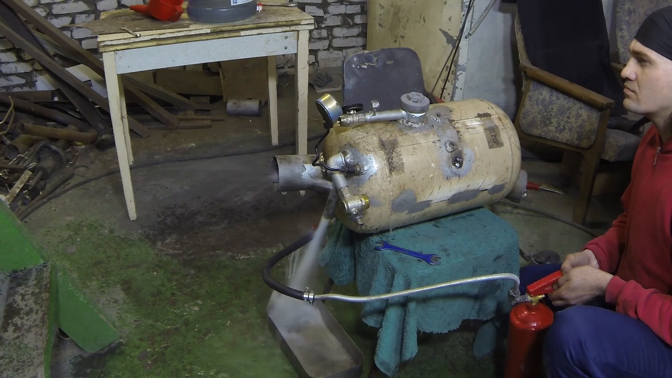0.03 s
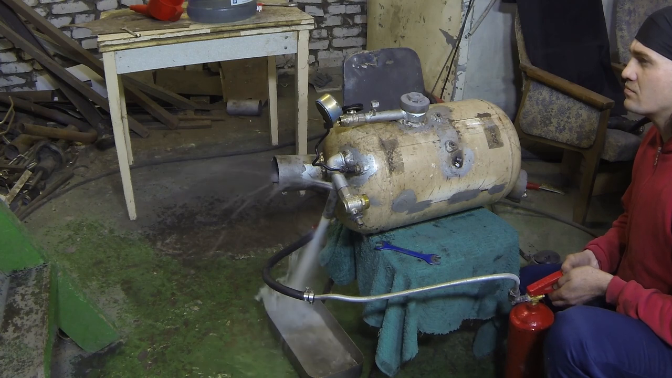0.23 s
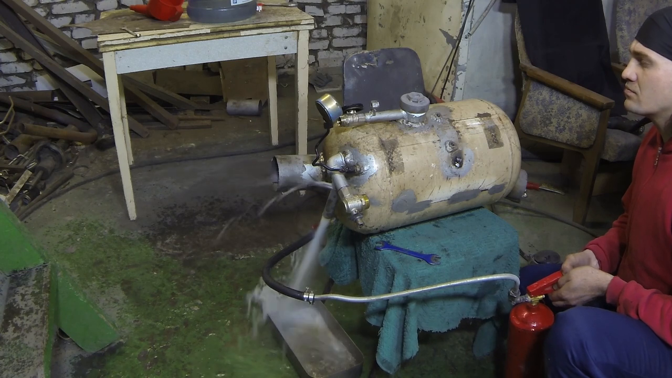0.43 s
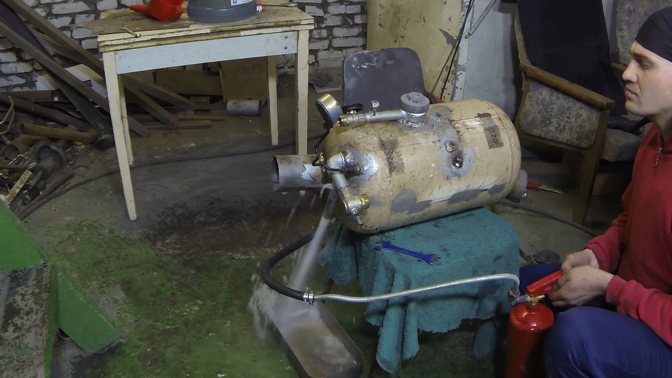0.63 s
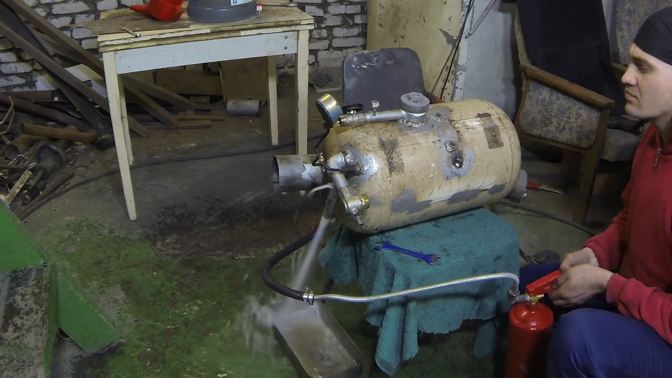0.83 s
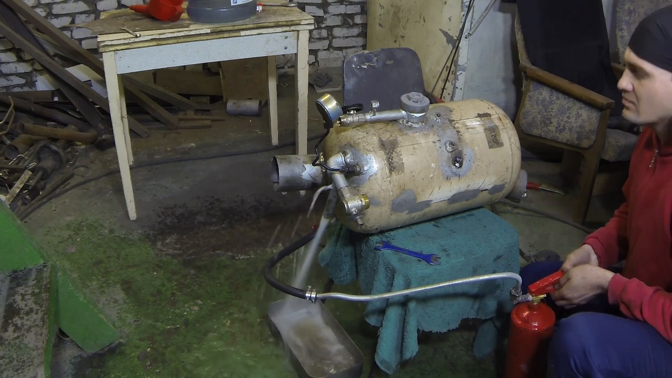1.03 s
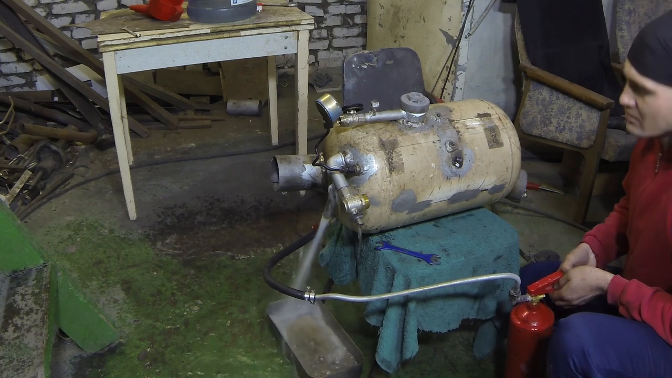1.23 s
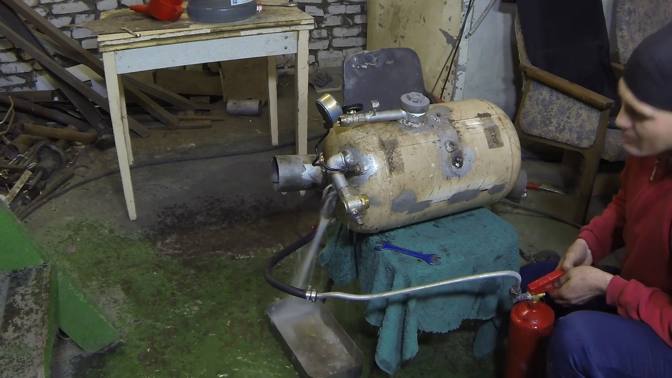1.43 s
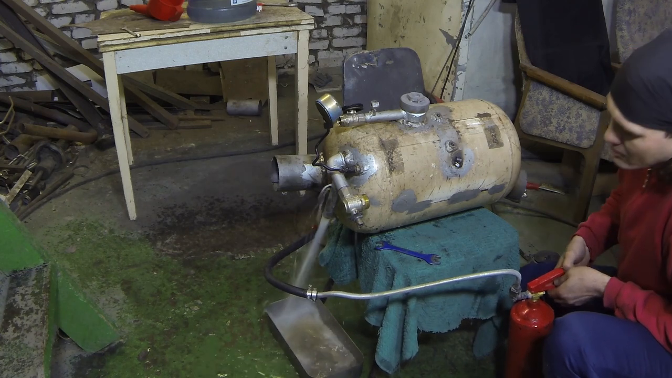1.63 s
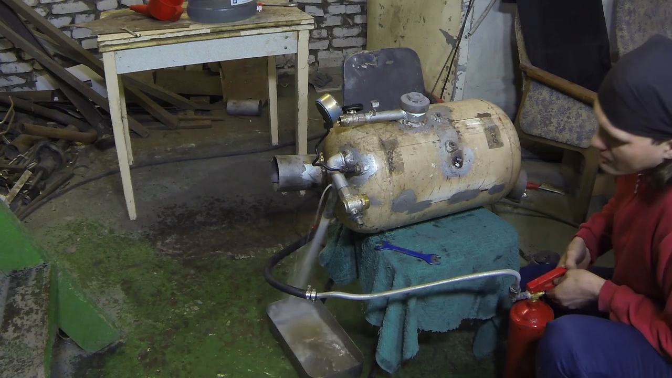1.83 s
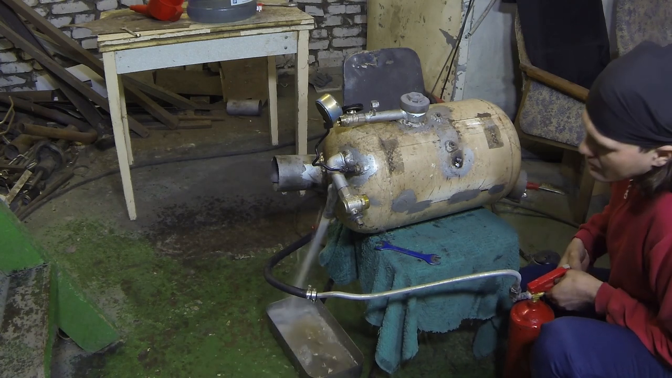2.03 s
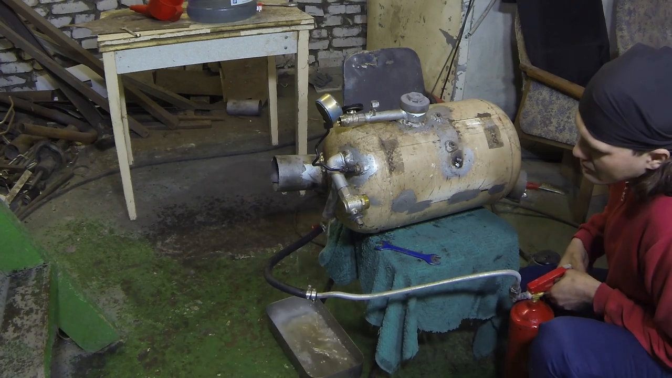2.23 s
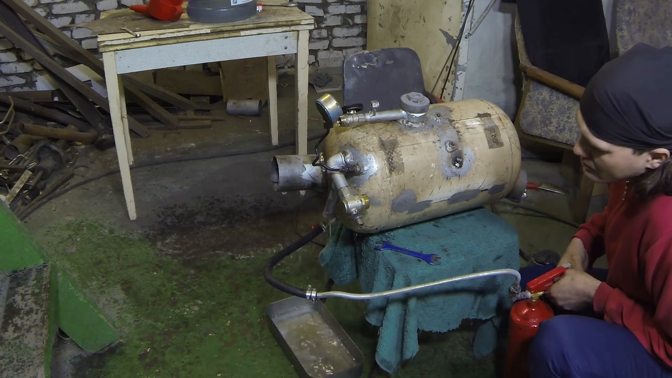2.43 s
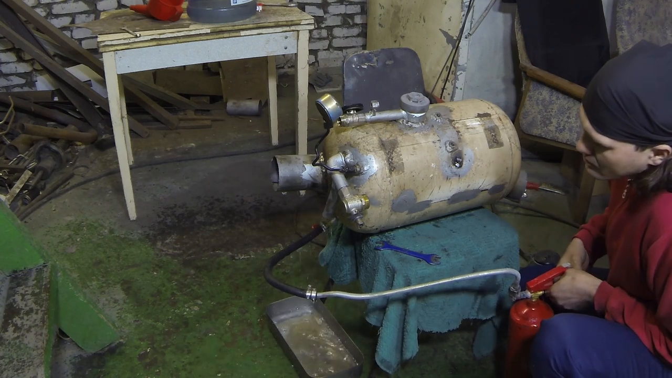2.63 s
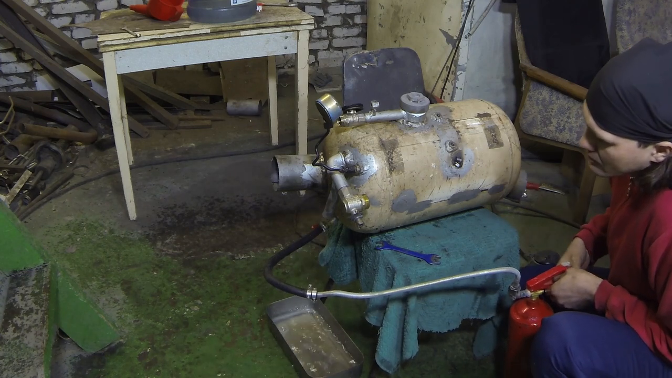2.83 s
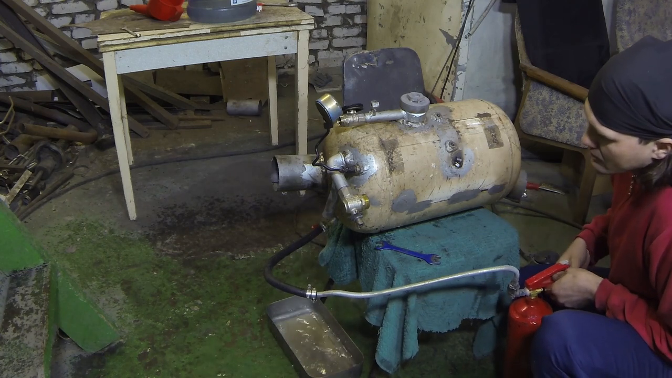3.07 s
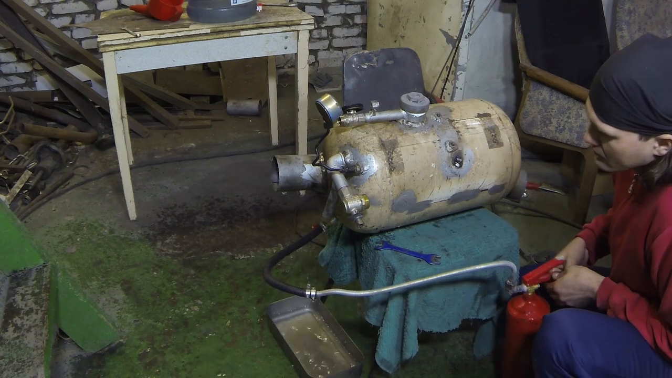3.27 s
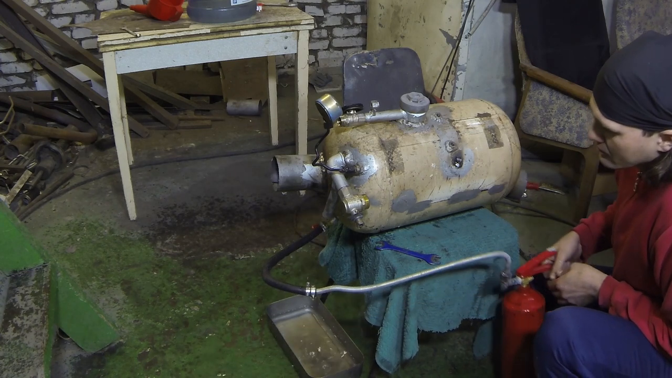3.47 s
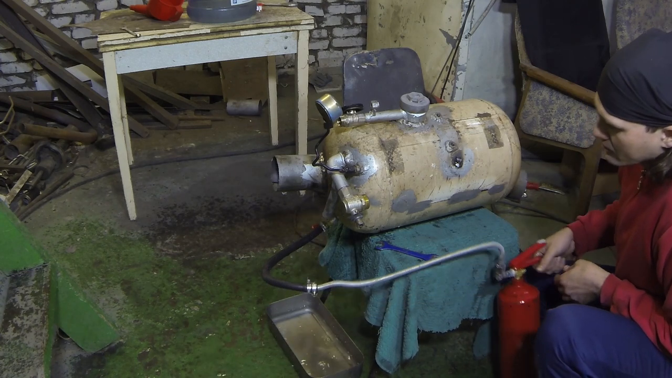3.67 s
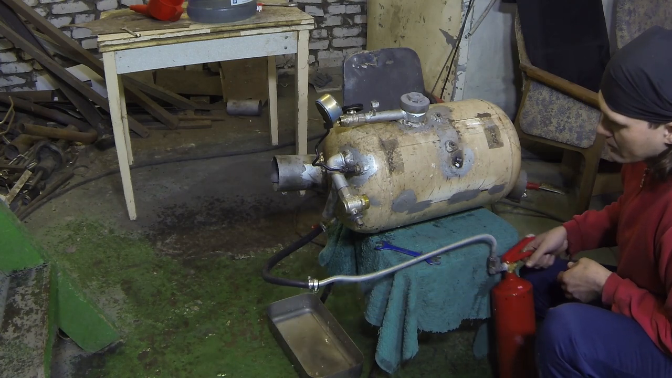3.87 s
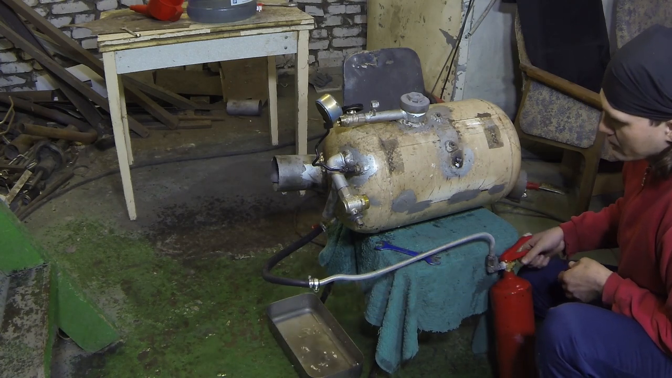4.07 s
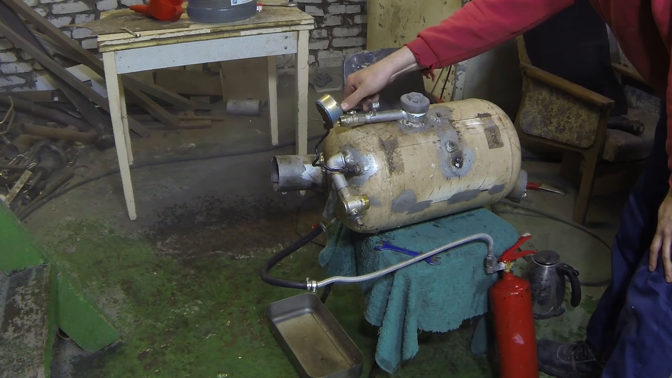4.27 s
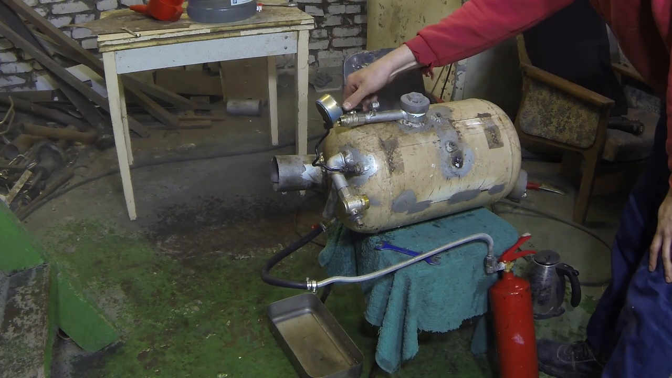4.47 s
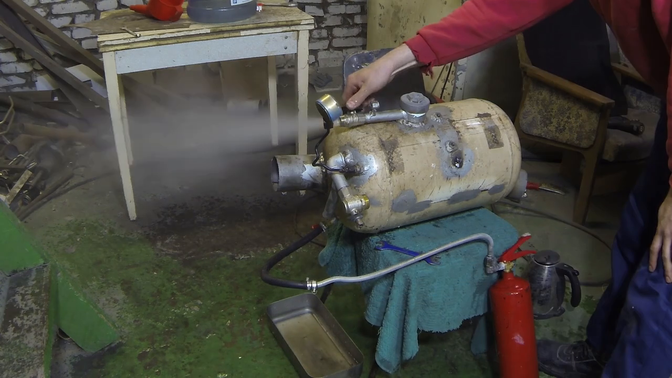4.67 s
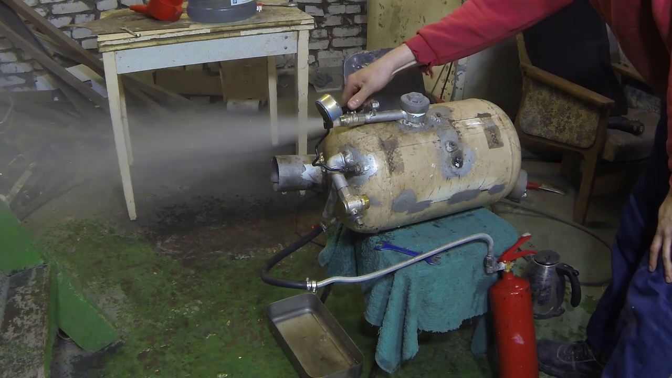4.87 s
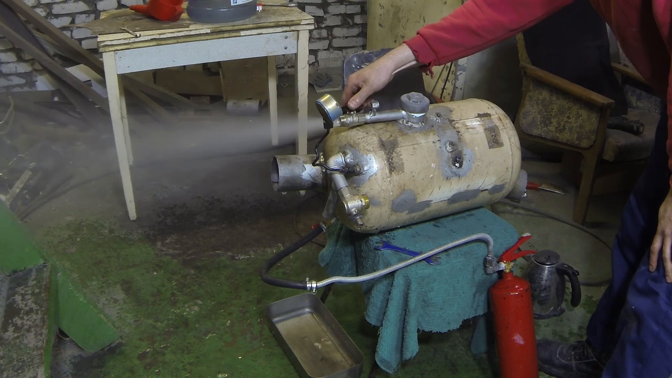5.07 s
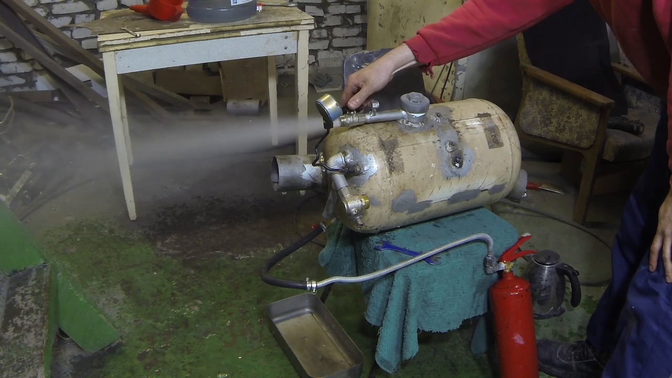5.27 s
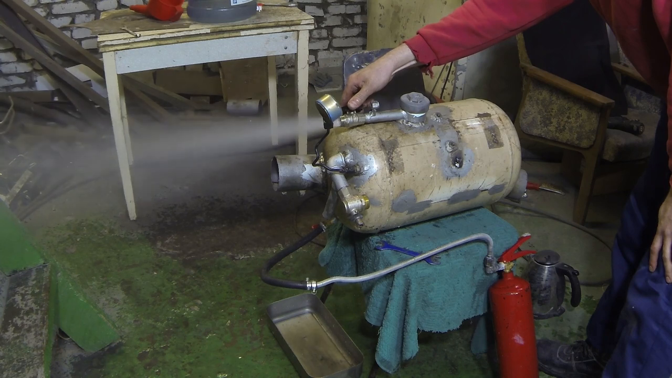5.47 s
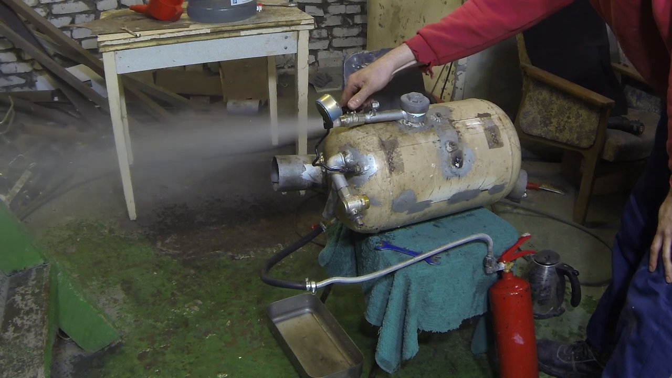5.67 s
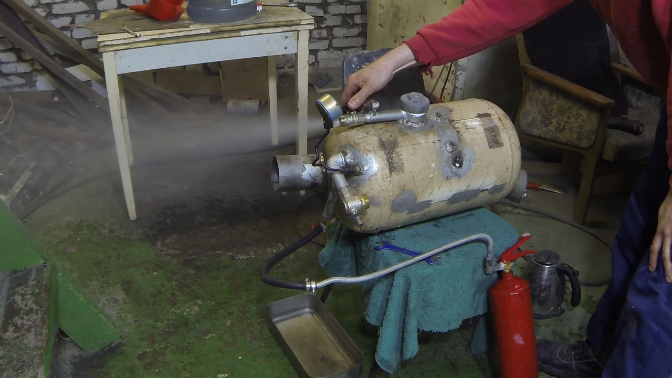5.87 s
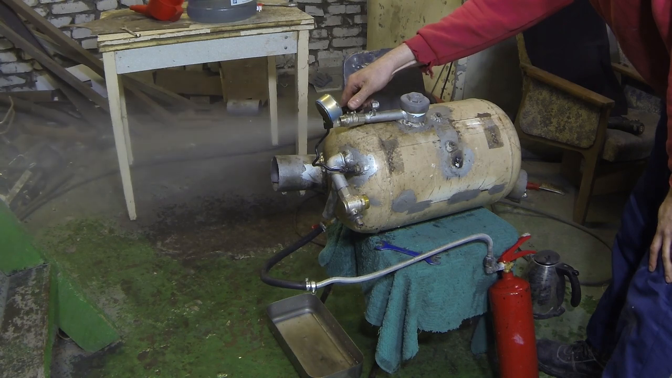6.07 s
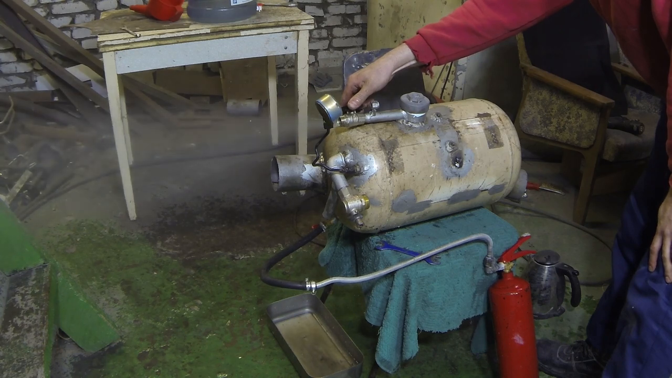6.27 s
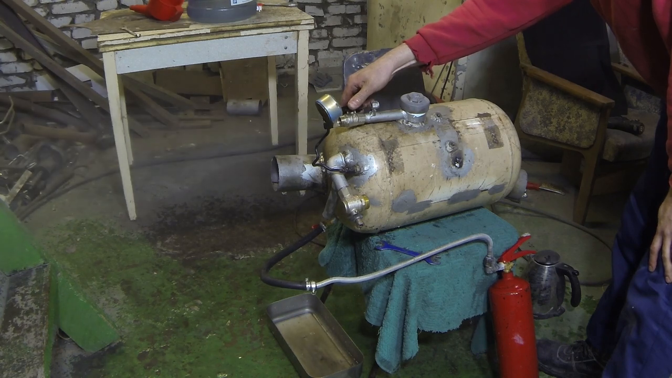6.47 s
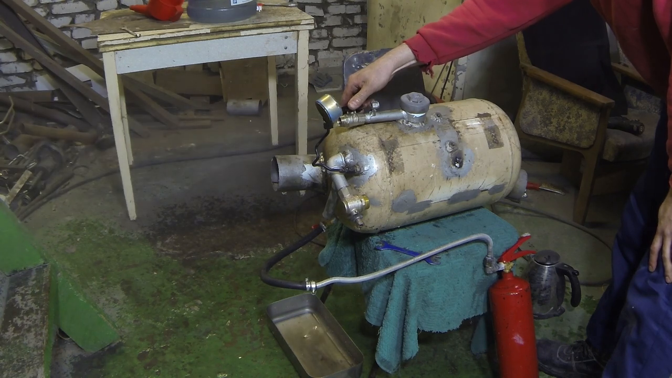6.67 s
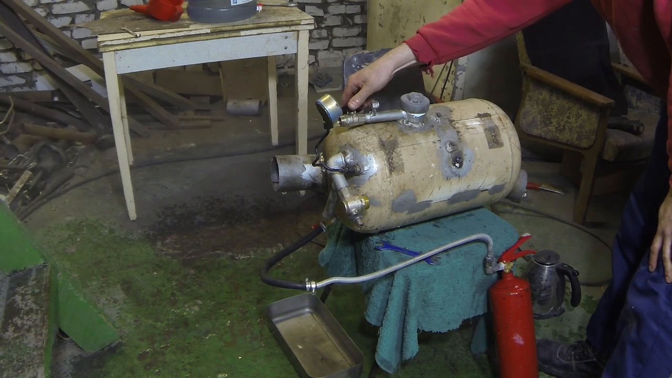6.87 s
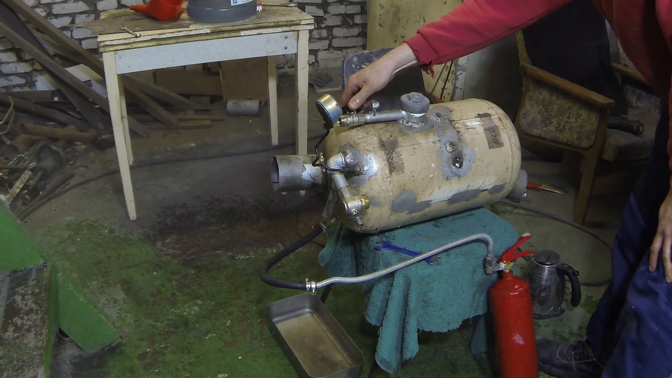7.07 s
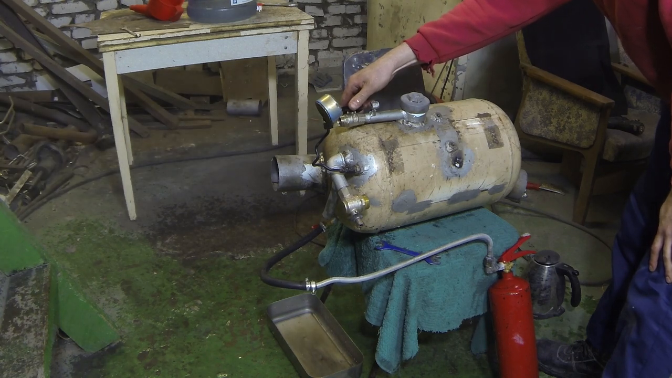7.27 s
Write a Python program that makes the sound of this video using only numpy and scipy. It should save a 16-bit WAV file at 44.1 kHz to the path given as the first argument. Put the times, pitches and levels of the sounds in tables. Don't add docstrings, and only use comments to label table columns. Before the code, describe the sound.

Water sprays hissing onto a metal tray, fades and shuts off; drips and small metal clinks, then a sudden loud shrill gas blast in a brick workshop.

```python
import sys
import numpy as np
from scipy import signal
from scipy.fft import rfft, irfft, next_fast_len
from scipy.io import wavfile
from scipy.ndimage import uniform_filter1d

SR = 44100
rng = np.random.default_rng(int(sys.argv[2]) if len(sys.argv) > 2 else 0)


def volts_from_db(level):
    exponent = np.asarray(level, float) / 20
    return 10 ** exponent


def inscribe(sig):
    pcm = np.round(np.clip(np.atleast_2d(sig).T, -1, 1) * 32767)
    wavfile.write(sys.argv[1], SR, pcm.astype(np.int16))


N = 322371
SHUT_S = 1.988

# start_s, level_db, dryness [0-1: dry gas is shrill, wet gas rings the throat]
BLAST = [(4.55, -11, -0.011), (4.68, -13, 0.74), (5.025, -13, 1.0), (5.06, -13.5, .12), (5.6, -13, -0.05),
         (5.88, -12, 0.39), (6.05, -14, 0.18), (6.6, -15, 0.074), (7.31, -17, -0.17)]
# pitch_hz, density_db [dB per Hz]
BLAST_COLOUR = [(150, -69), (250, -23.5), (583, -19), (852, -21), (1360, -13.5), (2360, -9), (3060, -2.5),
                (3570, 0), (4630, -7.5), (6540, -9.5), (7250, -15), (10800, -12.5), (12200, -18),
                (14500, -21.5), (15500, -29)]
# pitch_hz, width_hz, level_db
NOZZLE = [(2330, 20, -11), (2480, 18, -26), (2725, 25, -3), (2975, 19, -0.5), (3004, 36, -1.5),
          (3130, 11, 3), (3310, 29, -5), (3560, 38, -0.5), (3540, 41, -10.5), (3650, 16, -4.5),
          (3810, 26, -16), (4055, 40, -20), (4360, 25, -19.5), (5900, 60, -7), (6260, 40, -16),
          (7840, 110, -9.5), (8600, 200, -8), (9300, 150, -12)]
# start_s, pitch_hz, level_db [against the top of the blast]
EDGE_TONE = [(4.48, 11580, 9), (4.5, 10730, 18), (4.525, 10590, -3), (4.6, 10520, -6.5), (5.0, 10410, -6.5),
             (5.7, 10670, -7.5), (6.2, 11200, -13.5), (7.3, 11360, -3)]
# centre_s, length_s, roar_db, added_dryness [0-1]
SLUGS = [(4.802, 0.02, 5.5, -0.13), (5.064, 0.019, 4, .05), (5.312, 0.096, 10.5, 0.05),
         (5.503, 0.062, 8.5, 0.038), (5.172, 0.035, 0.5, -0.06), (5.664, 0.021, -4, 0.25),
         (5.794, 0.048, -0.5, -0.18), (6.297, .05, 0.5, -0.11), (6.622, 0.032, 4.5, .1),
         (6.746, 0.025, 0, -0.15), (7.075, 0.053, -0.5, .1)]


def gas_blast():
    level_db, dry = in_time(BLAST)
    dry = dry + sum(drier * swell(s, length) for s, length, db, drier in SLUGS)
    slug_db = sum(db * swell(s, length) for s, length, db, drier in SLUGS)
    above_db = level_db - level_db[-SR:].mean()

    throat_db = level_db - 2.5 - 11 * dry
    roar_db = 6 * dry - 0.91 * above_db + slug_db
    hiss_db = 13.5 * dry + 0.73 * above_db
    top_db = 17.5 * dry + 1.12 * above_db

    crack_s, open_s, pop_s = 4.489, 4.522, 0.004
    opening_s = [crack_s - 0.009, crack_s, open_s, open_s + pop_s]
    opening_db = np.interp(np.arange(N) / SR, opening_s, [-80, -36, -10, 0])

    shifts = [(1200, roar_db), (2100, roar_db * 0.33 + slug_db * 0.48), (3300, 0), (4800, hiss_db * 0.73),
              (6500, hiss_db), (10500, top_db), (14500, top_db * 0.76)]
    jet = volts_from_db(1.0) * turbulence(BLAST_COLOUR, gust_db=0.5, patchy_db=1.4, shifts=shifts)
    pipe = volts_from_db(-13) * whistles(NOZZLE, flutter_db=1.2)
    pipe += fade(4.57, 4.68) * whistles([(3300, 580, -2)], flutter_db=-0.5)
    pipe += (1 - fade(5.5, 6.1)) * whistles([(3485, 540, -8)], flutter_db=2.0)

    tone_hz, tone_db = in_time(EDGE_TONE)
    low_pass = signal.butter(2, 360.0, fs=SR, output="sos")
    wobble = rms_one(signal.sosfilt(low_pass, rng.standard_normal(N)))
    tone = wobble * np.sin(2 * np.pi * np.cumsum(tone_hz) / SR)
    tone *= volts_from_db(top_db + tone_db - 5 + 1.1 * drift(6))
    return volts_from_db(throat_db + opening_db) * (jet * spatter(per_s=220.0, spread_db=2.5) + pipe + tone)


# pitch_hz, density_db [dB per Hz]
WATER_COLOUR = [(18, -55), (30, -27), (225, -17.5), (307, -13.5), (332, -14.5), (432, -3), (518, -7.5),
                (747, -2), (830, -4.5), (1640, -10), (5040, -7), (6370, -6.5), (8280, -13), (9430, -10),
                (15500, -20)]
# pitch_hz, width_hz, level_db
TRAY = [(442.7, 38, 1), (489.3, 17, -1.5), (560.6, 16, -1), (632, 8.2, -4), (670, 9.2, 4), (743, 17, 2),
        (796.6, 18, -11), (896, 15, -4)]
# pitch_hz, width_hz, level_db [against the hiss]
SEAT_WHISTLES = [(4040, 300, -11), (5020, 820, -7.5), (5680, 200, -13), (6250, 230, -12.5),
                 (14900, 80, -34)]


def water_jet():
    t = np.arange(N) / SR
    sag_db = -3.5 * np.minimum(t, SHUT_S)
    collapse_db = 84 * np.maximum(t - SHUT_S, 0)
    hiss_db = -17.5 + sag_db - collapse_db
    drum_db = 1.0 + 0.61 * sag_db + 8.5 * swell(2.03, 0.037)
    drum_db += 0.21 * collapse_db
    top_db = 0.4 + 0.05 * sag_db
    shifts = [(700, drum_db), (4000, 0), (11000, top_db)]
    spray = volts_from_db(2.0) * turbulence(WATER_COLOUR, gust_db=0.0, patchy_db=0.1, shifts=shifts)
    tray = volts_from_db(drum_db - 16) * whistles(TRAY, flutter_db=1.5)
    seat = whistles(SEAT_WHISTLES, flutter_db=1.5)
    seat += fade(0.073, 0.75) * whistles([(3064, 200, -6)], flutter_db=2.0)
    seat += fade(1.0, 1.7) * whistles([(9340, 210, -11)], flutter_db=1.9)
    jet = spray * spatter(per_s=150.0, spread_db=2.0) + tray + seat
    return volts_from_db(hiss_db) * jet * fade(2.2, 2.48)


# start_s, length_s, pitch_hz, level_db
BOOMS = [(2.475, .075, 824, -48.5), (2.475, 0.062, 756, -54), (2.48, 0.16, 517, -57),
         (2.61, 0.068, 840, -40.5), (2.615, 0.071, 743, -51.5), (2.706, 0.072, 846, -53),
         (2.761, .11, 470, -51), (2.765, 0.096, 550, -49.5), (2.77, 0.091, 642, -50), (2.77, .13, 313, -56),
         (3.58, .08, 1220, -63), (4.327, .17, 613, -57), (4.33, .17, 690, -59), (4.32, 0.15, 1190, -63.5),
         (4.38, .09, 1510, -64)]
# start_s, length_s, pitch_hz, level_db
CHINKS = [(3.658, .04, 3300, -66), (3.70, .05, 2000, -65), (3.97, .055, 2760, -48.5),
          (4.01, .04, 2560, -56), (4.012, .03, 2380, -60), (4.03, 0.04, 2340, -54), (4.07, 0.05, 2380, -66),
          (4.09, .05, 3850, -69), (3.625, .06, 3800, -66), (4.302, .054, 2580, -63)]
# start_s, length_s, pitch_hz, level_db
SPLASHES = [(2.4105, .025, 6100, -44), (2.522, .03, 3600, -48), (2.905, .06, 2100, -55),
            (3.363, .045, 5500, -54), (3.516, .02, 900, -62), (3.974, 0.042, 3600, -57),
            (2.475, .015, 9300, -52), (2.96, .02, 11000, -56)]
# start_s, length_s, pitch_hz, level_db
FIZZES = [(2.305, .05, 6040, -46), (2.42, 0.13, 4200, -52.5), (2.95, 0.049, 5000, -57),
          (3.24, .04, 3960, -62), (3.325, 0.031, 6300, -58), (4.098, .05, 4700, -62)]
# start_s, length_s, pitch_hz, level_db
SNAPS = [(2.519, .025, 9000, -48.5), (2.605, .012, 10000, -47), (2.80, .045, 9000, -56),
         (3.3613, .0015, 7000, -43)]


def rattles():
    contact = rng.random(N), rng.standard_normal(N)
    out = flurries(BOOMS, contact, width_share=0.059, taps_per_s=200, rubbing=0.5)
    out += flurries(CHINKS, contact, width_share=0.028, taps_per_s=350, rubbing=0.2)
    out += flurries(SPLASHES, contact, width_share=0.27, taps_per_s=1600, rubbing=0.11)
    out += flurries(FIZZES, contact, width_share=0.18, taps_per_s=400, rubbing=0.8)
    out += flurries(SNAPS, contact, width_share=0.8, taps_per_s=900, rubbing=0.05)
    return out


def flurries(rows, contact, width_share, taps_per_s, rubbing):
    chance, sizes = contact
    out = np.zeros(N)
    t = np.arange(SR // 4) / SR
    for s, length, hz, db in rows:
        at = round(s * SR)
        span = slice(at, at + len(t))
        touch = (chance[span] < taps_per_s / SR) + rubbing
        taps = touch * sizes[span] * np.exp(-(t / length) ** 2)
        taps[0] = 1 + taps_per_s / 600
        rung = resonate(taps + 1e-18, hz, width_share * hz * 2)
        rung = resonate(rung, hz, width_share * hz)
        out[span] += volts_from_db(db) * rms_one(rung) * np.sqrt(length * 4)
    return out


# pitch_hz, density_db [dB per Hz]
DRIBBLE_COLOUR = [(1470, -32), (2500, -6), (6350, 2), (7250, -3), (12500, -5.5), (15200, -22), (16000, -35)]
# pitch_hz, density_db [dB per Hz]
RUSTLE_COLOUR = [(400, -17), (800, 1.5), (1250, -2), (2200, -10.5), (3500, -25)]
# start_s, bright_db, dull_db
STIRS = [(2.31, -47, -53), (2.42, -57, -66), (2.52, -49, -48), (2.81, -48, -54), (2.93, -54, -46),
         (3.07, -70, -65), (3.37, -52, -66), (3.46, -56, -68), (3.53, -65, -62), (3.89, -62, -55),
         (3.97, -58, -53), (4.04, -62, -56), (4.11, -61, -59)]


def pause_sounds():
    t = np.arange(N) / SR
    bright = volts_from_db(-41 - 11 * (t - SHUT_S))
    dull = volts_from_db(-53 - 9.5 * (t - SHUT_S))
    rise_s, fall_s = 0.011, 0.041
    for s, bright_db, dull_db in STIRS:
        stir = np.exp(np.minimum((t - s) / rise_s, (s - t) / fall_s))
        bright = bright + volts_from_db(bright_db) * stir
        dull = dull + volts_from_db(dull_db) * stir
    dribble = volts_from_db(-5.5) * bright * turbulence(DRIBBLE_COLOUR, gust_db=2.5, patchy_db=0.0)
    rustle = volts_from_db(-2) * dull * turbulence(RUSTLE_COLOUR, gust_db=2.5, patchy_db=3.0)
    both = dribble * spatter(per_s=80.0, spread_db=-11.0) + rustle
    return both * (1 - fade(1.9, 2.2)) * fade(4.55, 4.55)


# pitch_hz, density_db [dB per Hz]
WORKSHOP = [(12, -33.5), (20, 8), (50, -7), (101, -2.5), (168, -9), (399, -12), (472, -13.5), (1030, -21.5),
            (1150, -14.5), (1860, -27), (4670, -29), (6360, -28), (7950, -29), (12400, -28), (16000, -28)]
# pitch_hz, level_db [rms]
MAINS = [(100, -58), (200, -78), (300, -67.5), (400, -68)]
# pitch_hz, width_hz, level_db
LAMP_WHINE = [(12667, 200, -69)]


def workshop():
    t = np.arange(N) / SR
    hum = 0
    for hz, db in MAINS:
        hum = hum + volts_from_db(db + 2.5 * drift(8.5)) * np.sqrt(2) * np.sin(2 * np.pi * hz * t)
    floor = volts_from_db(-51.5) * turbulence(WORKSHOP, gust_db=0.1, patchy_db=0.4)
    return floor + hum + whistles(LAMP_WHINE, flutter_db=0.4)


def walls(x):
    t60_s, echo_db = 0.41, -7
    t = np.arange(SR // 3) / SR
    echoes = rng.standard_normal(len(t)) * volts_from_db(-60 * t / t60_s) * (t > 0.004)
    echoes *= volts_from_db(echo_db) / np.sqrt(np.sum(echoes ** 2))
    return (x + signal.fftconvolve(x, echoes)[:N]) / np.sqrt(1 + volts_from_db(2 * echo_db))


def turbulence(colour, gust_db, patchy_db, shifts=((1000, 0),)):
    points = np.array(colour)
    edges = 20 * 2 ** (np.arange(31) / 3)
    size = next_fast_len(N)
    log_hz = np.log(np.fft.rfftfreq(size, 1 / SR) + 1)
    shape = volts_from_db(np.interp(log_hz, np.log(points[:, 0]), points[:, 1]))
    spectra = rfft(rng.standard_normal((2, size))) * shape
    noise = rms_one(irfft(spectra, size)[:, :N])

    curves = [(curve + np.zeros(N))[::40] for hz, curve in shifts]
    anchors = np.log([hz for hz, curve in shifts])
    gust = steps(2.0) + 0.55 * steps(39)
    out = 0
    for k, (low, high) in enumerate(zip(edges, edges[1:])):
        hz = np.sqrt(low * high)
        if not points[0, 0] * 0.8 < hz < points[-1, 0] * 1.2:
            continue
        place = np.interp(np.log(hz), anchors, np.arange(len(shifts)))
        below = int(place)
        above = min(below + 1, len(shifts) - 1)
        bend = (1 - place + below) * curves[below] + (place - below) * curves[above]
        band = signal.sosfilt(signal.butter(2, [low, high], "band", fs=SR, output="sos"), noise[k % 2])
        out = out + smooth(volts_from_db(bend + gust_db * gust + patchy_db * steps(7))) * band
    return out


def whistles(modes, flutter_db):
    white = rng.standard_normal(N)
    out = 0
    for hz, width, db in modes:
        mode = rms_one(resonate(resonate(white, hz, width), hz, width))
        out = out + smooth(volts_from_db(db + flutter_db * steps(3.1))) * mode
    return out


def resonate(x, hz, width):
    r = np.exp(-np.pi * width / SR)
    zeros = (1 - r * r) / 2 * np.array([1, 0, -1])
    poles = [1, -2 * r * np.cos(2 * np.pi * hz / SR), r * r]
    return signal.lfilter(zeros, poles, x)


def spatter(per_s, spread_db):
    hits = (rng.random(N) < per_s / SR) * np.minimum(rng.exponential(1, N), 2.5)
    return volts_from_db(spread_db * signal.lfilter([1], [1, -0.96], hits))


def steps(rate):
    r = np.exp(-80 * np.pi * rate / SR)
    chance = rng.standard_normal(N // 40 + 2002)
    return rms_one(signal.lfilter([1], [1, -2 * r, r * r], chance)[2000:-1])


def smooth(values):
    return np.interp(np.arange(N) / 40, np.arange(len(values)), values)


def drift(rate):
    return smooth(steps(rate))


def in_time(rows):
    s, *columns = np.transpose(rows)
    return [np.interp(np.arange(N) / SR, s, c) for c in columns]


def swell(centre, length):
    return np.exp(-((np.arange(N) / SR - centre) / length) ** 2)


def fade(start, end):
    return np.interp(np.arange(N) / SR, [start, end], [1, 0])


def rms_one(x):
    return x / np.sqrt(np.mean(x ** 2) + 1e-20)


def scene():
    knocks = rattles()
    echoing = walls(water_jet() + gas_blast() + pause_sounds() + 0.52 * knocks)
    mid = echoing + 0.5 * knocks + workshop()
    return np.array([mid, mid])


# start_s, edge_oct [octaves above 100 Hz]
STARVED = [(4.5, -6.0), (4.53, 3.1), (5.0, 3.3), (5.03, 2.1), (5.2, 1.3), (5.62, 1.3), (6.02, 2.5),
           (6.88, 1.5), (6.92, -1.5)]
# start_s, pitch_hz, level_db
STRAYS = [(4.6, 600, 12.5), (4.8, 640, 4), (4.9, 670, 6), (5.82, 290, 5), (6.83, 200, 12), (5.68, 320, 1),
          (5.92, 440, 7)]
FILLS = [.513, 1.023, 1.047, 1.07, 1.418, 1.929, 2.37, 2.858, 4.181, 4.622, 4.831, 4.878, 5.11, 5.992,
         6.225, 6.248, 6.457, 6.735, 6.805, 6.991]


def starve(mid):
    window = signal.windows.kaiser_bessel_derived(2048, 4 * np.pi)
    lead = 1024 - 75
    hz, s, lines = signal.stft(np.pad(mid, (lead, 0)), SR, window, 2048, 1024)
    s = s - lead / SR
    audible = (hz < 15730)[:, None]

    edge = np.where(s < 1.25, -2.0, np.interp(s, *np.transpose(STARVED)))
    edge += np.where(s < STARVED[-1][0], 0.22, 1.5) * rng.standard_normal(s.size)
    waver = np.repeat(rng.exponential(1, (hz.size // 3 + 1, s.size)), 3, axis=0)[:hz.size]
    octave = np.log2(np.maximum(hz, 5) / 100)[:, None]
    kept = np.clip((octave - edge + 0.3 - 0.8 * waver * (edge > -5)) * 8, 0, 1) * audible
    usual = uniform_filter1d(abs(lines), 15, axis=0)
    kept *= abs(lines) > usual * 1.5 * np.exp(-(octave - edge) / 1.3) * (edge > 0)
    for at, stray_hz, db in STRAYS:
        kept[abs(hz - stray_hz) < 33, np.argmin(abs(s - at))] = volts_from_db(db)
    lines *= np.maximum(kept, volts_from_db(-51) * audible)

    side = np.zeros_like(lines)
    turns = np.exp(2j * np.pi * rng.random(lines.shape))
    for at, pick in zip(FILLS, rng.random((len(FILLS), 2))):
        low = 4000 + (14200 - 4000) * np.sqrt(pick[:, None])
        band = ((hz > low) & (hz < low + 1400)).any(axis=0)
        frame = np.argmin(abs(s - at))
        side[band, frame] = volts_from_db(-2.5) * lines[band, frame] * turns[band, frame]
    pair = signal.istft([lines + side, lines - side], SR, window, 2048, 1024)[1]
    return pair[:, lead:lead + N]


def band_limit(x):
    return signal.sosfilt(signal.butter(12, 16380, fs=SR, output="sos"), x)


def record(dry):
    ceiling = 0.88
    rounded = dry[0] / (1 + (dry[0] / ceiling) ** 4) ** (1 / 4)
    mix = starve(rounded)
    return band_limit(mix)


dry = scene()
out = record(dry)
inscribe(out)
```